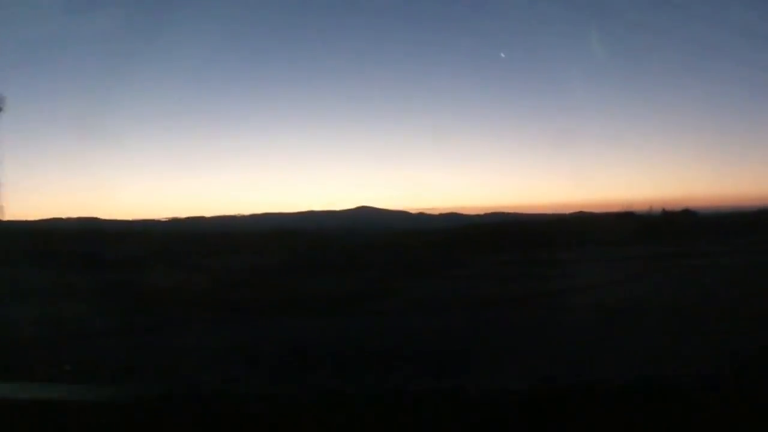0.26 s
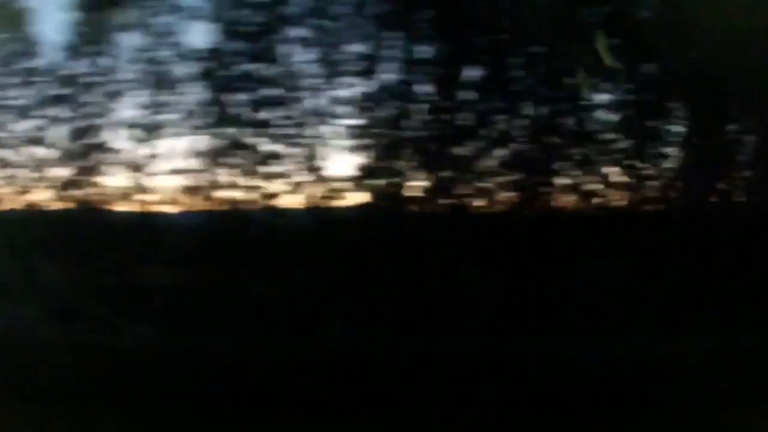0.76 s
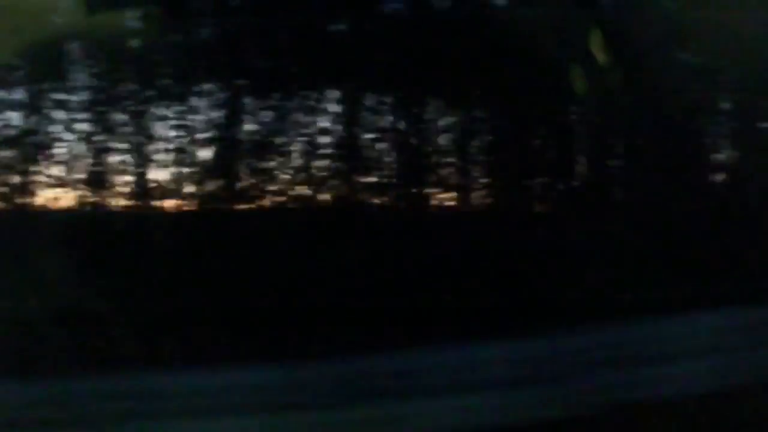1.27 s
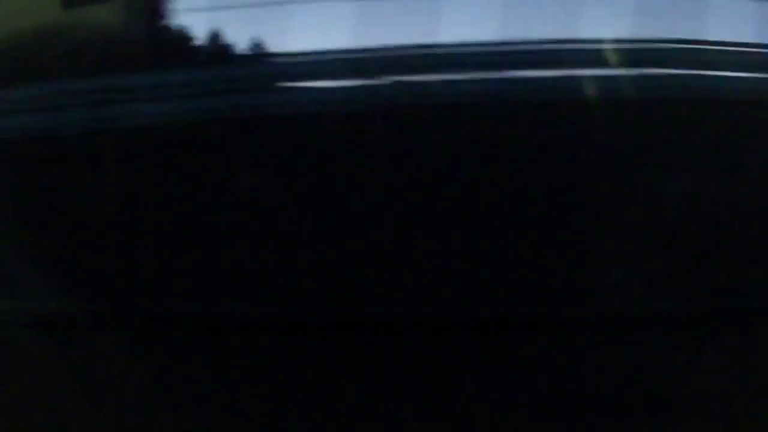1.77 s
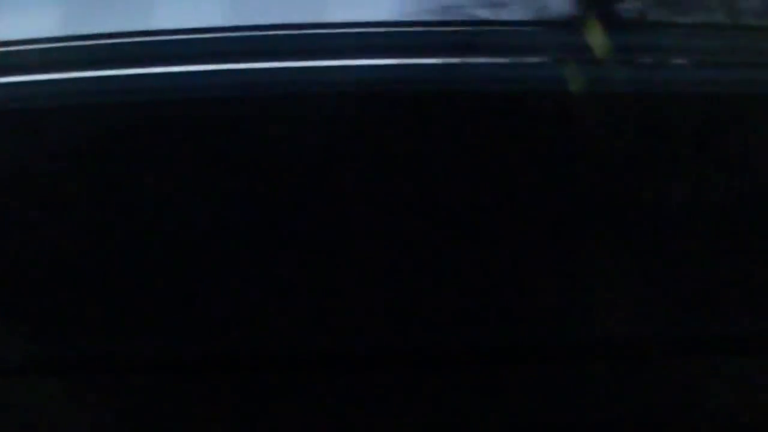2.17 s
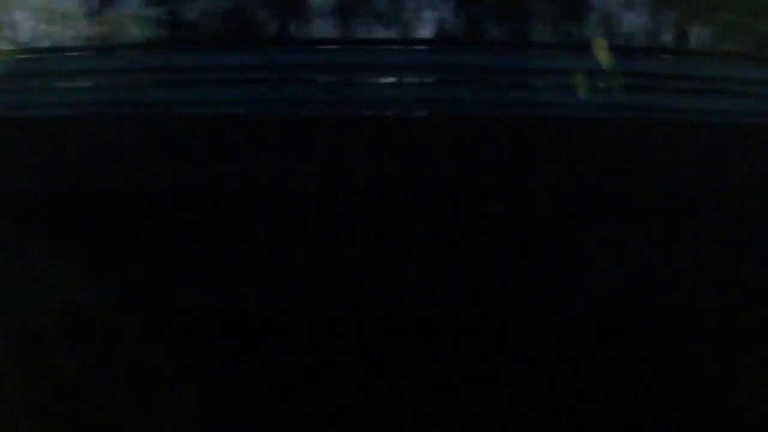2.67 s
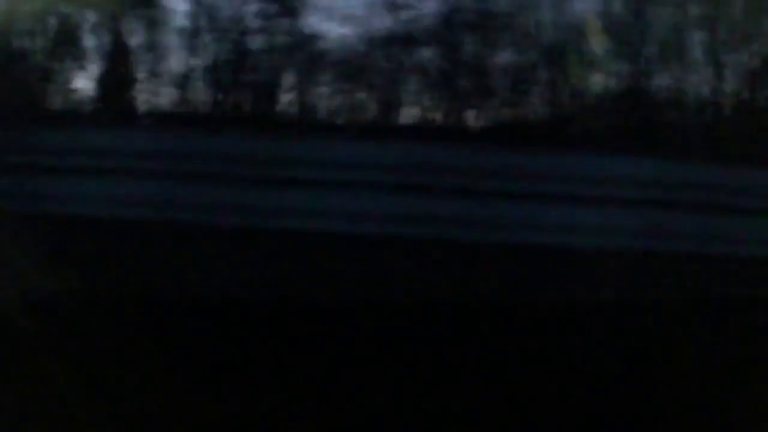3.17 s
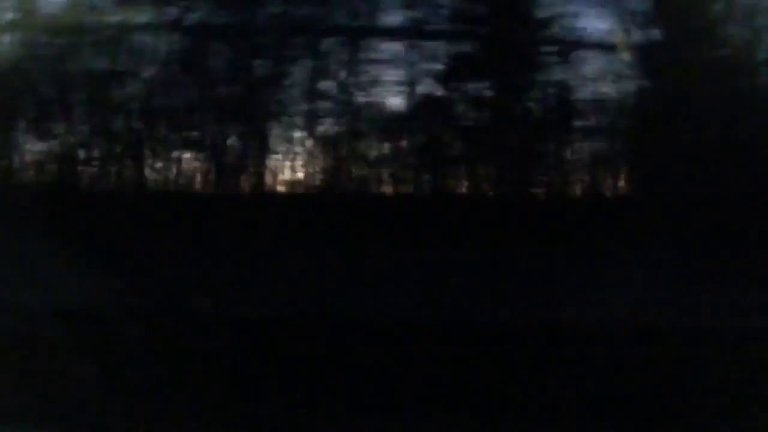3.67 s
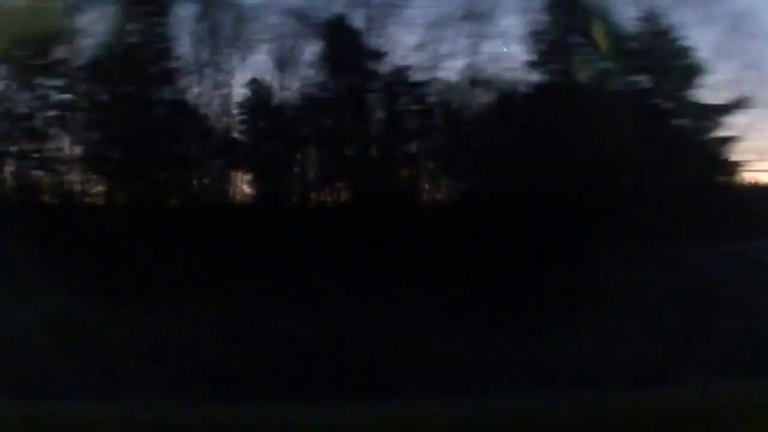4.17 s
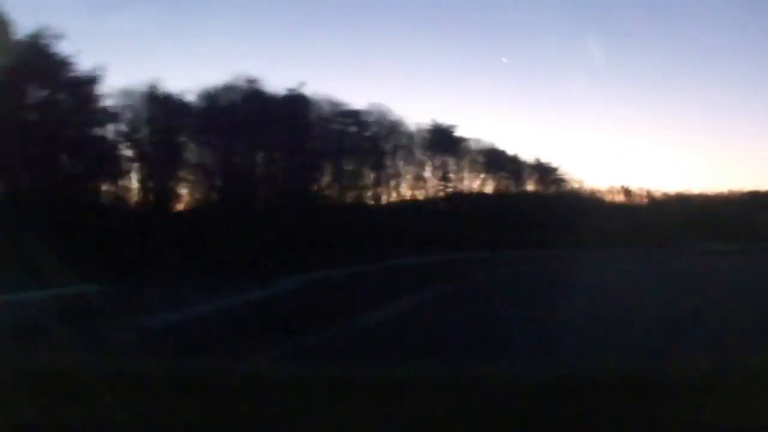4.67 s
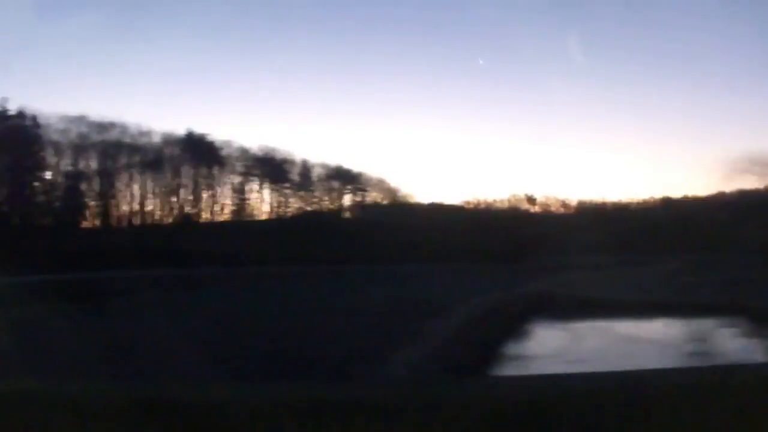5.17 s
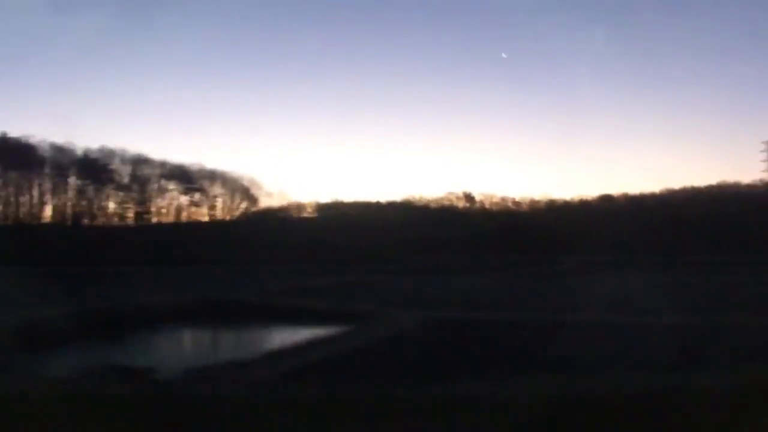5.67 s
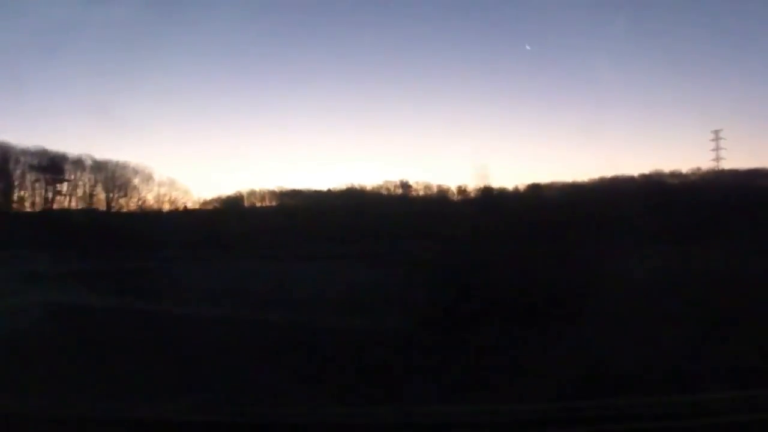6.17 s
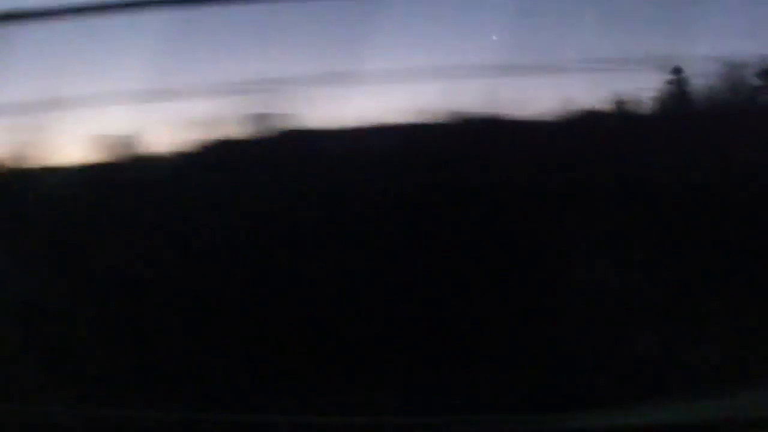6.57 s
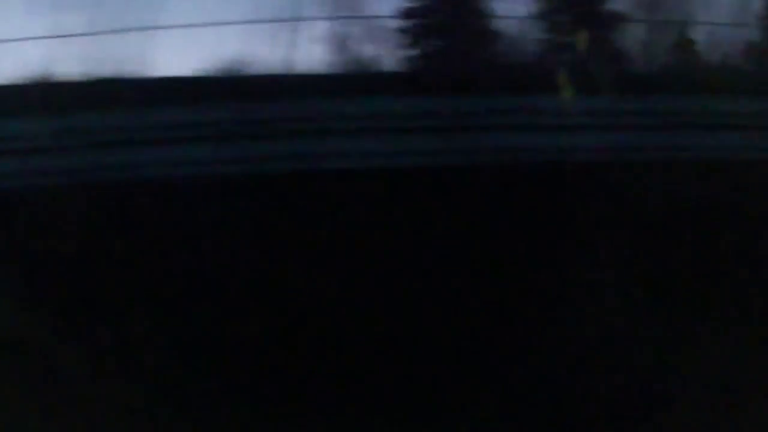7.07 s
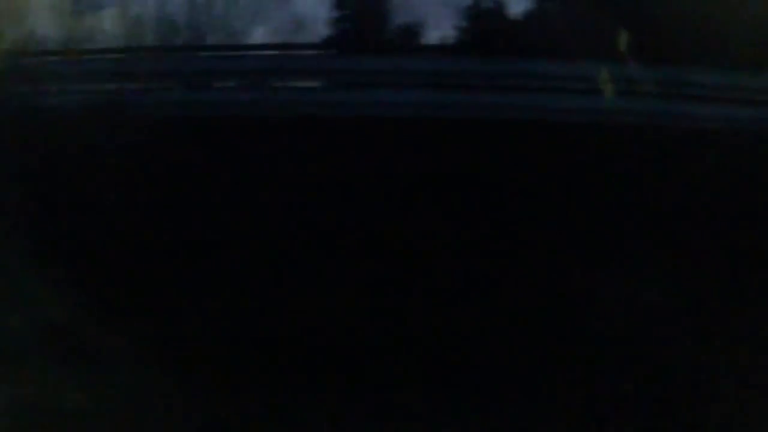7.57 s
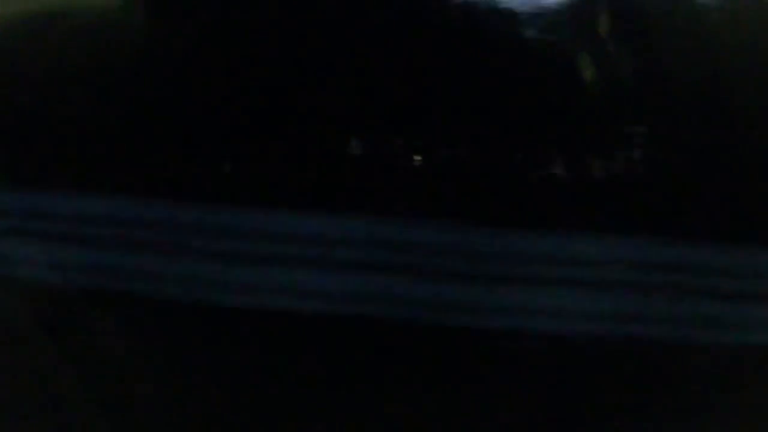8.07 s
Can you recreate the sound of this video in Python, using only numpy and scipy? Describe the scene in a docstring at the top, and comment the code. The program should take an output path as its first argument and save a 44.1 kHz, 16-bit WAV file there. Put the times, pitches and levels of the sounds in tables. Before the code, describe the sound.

A fast train runs at steady speed for about eight seconds, heard from a seat inside the passenger cabin. A low, slightly wavering drone from the floor and walls continues throughout, together with the roar of rolling wheels, a high metallic singing on the rails and a faint air hiss. Fittings tick lightly here and there. Trackside masts swish past right at the start and at 0.7 seconds. At 1.2 seconds one sharp tick rings from the trim. A faint swish follows at 3.1 seconds and a small knock at 4.3. Three more masts swish by at about 4.6, 5.1 and 5.7 seconds. The wheel noise swells most near 5.9 seconds, eases, and rises a little again around 7.1. Tiny dry snaps occur, clearest at 4.8 and 6.7 seconds. The overall sound has little deep bass and a dulled treble.

```python
"""Inside a fast train at steady speed. From the start, floor and shell drone in their cabin modes, wheels roar
and sing on the rail, air hisses and fittings tick. Two masts swish past in the first second; at 1.2 s one sharp
tick rings the trim. A faint mast follows at 3.1 s, a knock at 4.3 s, then three more masts. Near 5.9 s the
wheel noise swells most, as trackside surfaces reflect it. Throughout, the recorder cuts the bass and notches
the treble; its signal path adds two dry snaps, and faint clicks come now and then."""
import sys
import numpy as np
from scipy import signal
from scipy.fft import rfft, irfft, next_fast_len
from scipy.io import wavfile
from scipy.ndimage import map_coordinates

SR = 44100
rng = np.random.default_rng(int(sys.argv[2]) if len(sys.argv) > 2 else 0)


def log_audio(samples):
    """Write samples as a 16-bit WAV file to the path given in sys.argv[1]."""
    # one column per channel
    frames = np.atleast_2d(samples).T
    # limit to full scale, then quantise
    limited = np.clip(frames, -1, 1)
    pcm = np.round(limited * 32767).astype(np.int16)
    wavfile.write(sys.argv[1], SR, pcm)


N = 366471

# Noise spectra, as relative spectral density: frequency_hz, density_db
DRONE_SPECTRUM = [(30, -11), (60, -3.5), (100, -6.5), (140, -2.5), (220, -2.5), (350, -4), (550, -11.5),
                  (900, -22.5), (1500, -19.5)]
ROAR_SPECTRUM = [(250, -8.5), (500, 6), (800, 2.5), (1200, -2), (1700, -4.5), (2400, -13.5), (3400, -36),
                 (4500, -55.5), (6500, -46)]
SINGING_SPECTRUM = [(1200, 11), (1700, 2.5), (2300, 8), (2800, 1.5), (3500, -15.5), (4500, -38.5),
                    (6500, -39.5)]
SWISH_SPECTRUM = [(900, 12.5), (1800, 4), (2400, 11), (3400, -14), (4500, -24)]
RUSH_SPECTRUM = [(3000, -2), (4500, 1.5), (6000, 1.5), (7800, -10.5), (10000, -18)]
EDGE_SPECTRUM = [(2000, -7), (2600, -11), (3400, 3.5), (3800, -4.5), (4300, -27)]
HISS_SPECTRUM = [(2500, 7.5), (4400, -0.5), (6000, 2.5), (7800, -2), (8300, -5.5), (10000, -10),
                 (11200, -18.5), (12500, -31.5), (14500, -28), (15600, -18.5)]
# Resonances of cabin, rail and wheel: centre_hz, width_hz, lift_db
CABIN_MODES = [(114, 21.6, 7), (127.1, 12, 4.5), (168.3, 18.7, 9), (213.7, 22.4, 4), (248, 34, 4),
               (309.7, 33, 5.5), (457, 60, 4), (560, 42, 3.5)]
RAIL_MODES = [(721, 35, 4), (976, 130, 2.5)]
WHEEL_MODES = [(2190, 61, 6), (2388, 55, 4), (3640, 330, 4)]
# The drone's hum and boom waver irregularly by a few decibels: time_s, hum_db, boom_db
DRONE_WAVER = [(0, 0, -0.5), (.6, 0.5, 1), (.9, 1.5, 3), (1.15, -0.5, -1), (1.5, 0, 1), (2, 2.5, 0.5),
               (2.5, 1.5, -1.5), (3, 1.5, -0.5), (3.5, -0.5, 2), (3.72, 1, 0.5), (4, 3, -2), (4.6, -0.5, 2),
               (5.1, -2, -1.5), (5.6, 0, 1), (6.1, -3.5, 2.5), (6.6, 0.5, 0), (7.1, -3, 1), (7.6, -0.5, 2),
               (8.31, 3.5, -2)]
# Trackside reflection, given as the level of the singing: time_s, level_db
TRACKSIDE_REFLECTION = [(0, -41.5), (1.5, -42.5), (3.9, -43.5), (4.3, -41), (4.6, -40), (5.9, -35.5),
                        (6.3, -40), (6.75, -40.5), (7.1, -38), (8.31, -39)]
# Masts passing the window: peak_s, swish_db, rush_db, length_s, edge_db
MAST_PASSES = [(0.037, -27.5, -55, 0.054, -56), (0.68, -35, -56, 0.059, -51), (3.115, -43, -65, 0.071, -62),
               (4.61, -32.5, -57, 0.15, -54), (5.145, -30.5, -51.5, 0.061, -49),
               (5.72, -39, -54.5, 0.07, -48.5)]
# Contacts in the fittings: start_s, relative_level_db, contact_s, left_over_right_db
CONTACTS = [(0.153, -42, .006, -1), (0.299, -43, .006, 1), (0.810, -43, .006, 0), (0.927, -39, 0.0065, 1),
            (1.2309, -10, .00002, 4), (1.565, -32.5, 0.007, 0), (1.6, -44, .006, 2), (1.987, -42, .005, -4),
            (2.008, -44, .005, 0), (3.603, -42.5, 0.0055, 0), (4.179, -44, .006, 0), (4.254, -40, 0.011, 2),
            (4.3153, -22, 0.0074, -1), (4.668, -34.5, .007, 1), (4.867, -41, .0065, 0),
            (4.885, -42, .005, 0), (5.513, -45, .005, 0), (5.911, -43, .005, 0), (5.962, -36.5, .005, 0),
            (6.145, -44, .005, 0), (6.888, -44, .006, 0), (6.931, -42, .006, 0)]
# Modes of the struck trim: pitch_hz, relative_level_db, t60_s
TRIM_MODES = [(960, -8, 0.0076), (1490, -15, 0.014), (2100, -11, 0.003), (3370, -17.5, 0.0038),
              (4500, -15.5, 0.0018), (5640, -20.5, 0.0033), (6840, -13, 0.0041), (7250, -3.5, 0.0026),
              (8100, 1.5, 0.0016), (9040, -10.5, 0.0051), (10300, -3, 0.0033), (15500, 12.5, .002)]
# Likeness of the noise at the two capsules: frequency_hz, correlation
STEREO_CORRELATION = [(30, 0.94), (70, 0.992), (180, 0.998), (320, 0.99), (600, 0.96), (1130, 0.91),
                      (1700, 0.86), (2600, 0.66), (4000, 0.72), (8000, 0.2), (15000, 0.22)]
# Balance of the noise between the capsules: frequency_hz, left_over_right_db
STEREO_BALANCE = [(60, 0.3), (500, -0.9), (1700, 0), (2600, 0), (4500, -2), (7000, -1), (9000, -0.5),
                  (15000, -1)]
# Stop bands of the recorder: centre_hz, width_hz, depth_db
TREBLE_NOTCHES = [(3000, 800, 32), (4010, 1200, 26), (5000, 1200, 30), (11900, 2600, 40), (13600, 2500, 30)]
# Rectangular pulses: dry snaps from the signal path at 4.8 and 6.7 s, the rest faint clicks: start_s, level_db,
# length_ms
SNAPS_AND_CLICKS = [(.738, -44, .05), (1.407, -45, .12), (1.9325, -46, .06), (2.163, -46, .06),
                    (2.3275, -46, .06), (4.808, -33, .045), (6.511, -45, .06), (6.6937, -30, .15)]

TIME_S = np.arange(N) / SR
OPPOSED = np.array([[1], [-1]])   # left and right with opposite signs
OPEN_TRACK_DB = -43   # the singing with nothing beside the line


def cabin_drone(swell_db):
    """Resonance: floor and shell drone in the cabin modes; the hum and boom waver irregularly."""
    level_db = -23 + 0.18 * swell_db + 0.11 * drift(rate_hz=7.9)
    drone = from_db(level_db) * noise(DRONE_SPECTRUM, CABIN_MODES)
    hum_hz, boom_hz = (150, 190), (200, 340)
    times_s, hum_db, boom_db = np.transpose(DRONE_WAVER)
    for band_hz, waver_db in ((hum_hz, hum_db), (boom_hz, boom_db)):
        band = butterworth(drone, 1, band_hz, "band")
        drone = drone + (from_db(np.interp(TIME_S, times_s, waver_db)) - 1) * band
    return drone


def rolling_roar(swell_db):
    """Forced vibration: rolling wheels drive the rail, whose resonances colour a broad roar."""
    level_db = -30 + 0.41 * swell_db + 0.86 * drift(rate_hz=5.8)
    return from_db(level_db) * noise(ROAR_SPECTRUM, RAIL_MODES)


def wheel_singing(swell_db):
    """Resonance and reflection: wheel on rail sings in high modes, and the trackside throws it back."""
    level_db = OPEN_TRACK_DB + swell_db + 1.1 * drift(rate_hz=25)
    return from_db(level_db) * noise(SINGING_SPECTRUM, WHEEL_MODES)


def passing_masts():
    """Reflection and displacement: each mast returns the wheel noise and squeezes air along the glass."""
    envelopes = np.zeros((3, N))
    for peak_s, swish_db, rush_db, length_s, edge_db in MAST_PASSES:
        width_s = length_s * np.where(TIME_S < peak_s, 0.63, 1.18)   # comes faster than it goes
        bell = np.exp(-((TIME_S - peak_s) / width_s) ** 2)
        envelopes += from_db([[swish_db], [rush_db], [edge_db]]) * bell
    swish, air_rush, bright_edge = envelopes
    return (swish * noise(SWISH_SPECTRUM) + air_rush * noise(RUSH_SPECTRUM)
            + bright_edge * noise(EDGE_SPECTRUM))


def ticking_fittings():
    """Impact excitation: contacts ring the trim off to one side, so the right capsule hears it later."""
    out = np.zeros((2, N))
    softness_hz, right_lag_s = 10100, .000015
    for start_s, level_db, contact_s, pan_db in CONTACTS:
        drawn_out = contact_s > 1 / softness_hz
        force = contact_force(contact_s, softness_hz, drawn_out)
        tick = struck_trim(force, drawn_out) * from_db(level_db + pan_db / 2 * OPPOSED)
        if not drawn_out:
            tick += from_db(level_db + 6) * recorder_rocking(force) * OPPOSED
        start = round(start_s * SR)
        out[:, start:start + len(force)] += tick
    right = map_coordinates(out[1], [np.arange(N) - right_lag_s * SR], order=3)
    return np.array([out[0], right])


def contact_force(contact_s, softness_hz, drawn_out):
    """Compliance: a run of rough touches loses its highs; the cabin adds a faint reverberant tail."""
    t = np.arange(SR // 10) / SR
    touches, echo = rng.standard_normal((2, len(t)))
    force = np.sign(touches) * np.exp(-2 * (t / contact_s) ** 2)
    if drawn_out:
        force *= t / contact_s + 0.3   # builds before it fades
    tail_db, tail_t60_s = (-28, 0.08) if drawn_out else (-40, .026)
    tail = echo * from_db(tail_db - 60 * t / tail_t60_s)
    force = butterworth(force / np.sqrt(force @ force) + tail, 4, softness_hz)
    return butterworth(force, 2, 9000) if drawn_out else force   # a long contact is softer still


def struck_trim(force, drawn_out):
    """Modal superposition: low modes knock in alternating polarity, high modes tick in phase."""
    knock = tick = 0
    for k, (pitch_hz, level_db, t60_s) in enumerate(TRIM_MODES):
        mode = from_db(level_db) * ring(force, pitch_hz, t60_s)
        if pitch_hz < 6000:
            knock += mode * (-1) ** k
        else:
            tick += mode
    knock_db = 14.5 if drawn_out else 4.5
    return from_db(knock_db) * knock + butterworth(tick, 4, 6900, "high")


def recorder_rocking(force):
    """Sympathetic vibration: a sharp tick rocks the recorder's body, which builds up and dies away."""
    pitch_hz, t60_s, build_s, delay_s = 1950, .007, .001, .0005
    body = ring(force, pitch_hz, t60_s)
    gain = 2 * (1 - np.exp(-1 / (build_s * SR)))   # offsets the second resonator's gain
    rocking = gain * ring(body, pitch_hz, build_s * np.log(1000))
    return np.roll(rocking, round(delay_s * SR))


def air_hiss():
    """Flow noise: air makes a faint, wavering hiss."""
    return from_db(-56.5 + 0.86 * drift(rate_hz=25)) * noise(HISS_SPECTRUM)


def noise(spectrum, modes=()):
    """Partial coherence: coloured noise with resonant peaks, as two close capsules hear it; rms 1."""
    size = next_fast_len(N)
    hz = np.arange(size // 2 + 1) * SR / size
    density_db = at_hz([(spectrum[0][0] / 2, -70), *spectrum, (spectrum[-1][0] * 1.4, -70)], hz)
    for centre_hz, width_hz, lift_db in modes:
        density_db += lift_db / (1 + (2 * (hz - centre_hz) / width_hz) ** 2)
    mid, side = rfft(rng.standard_normal((2, size)))
    correlation = at_hz(STEREO_CORRELATION, hz)
    pair = np.sqrt(1 + correlation) * mid + np.sqrt(1 - correlation) * side * OPPOSED
    balance_db = at_hz(STEREO_BALANCE, hz) / 2 * OPPOSED
    return rms_one(irfft(pair * from_db(density_db + balance_db), size)[:, :N])


def drift(rate_hz):
    """Random modulation: noise smoothed above rate_hz, with rms near 1."""
    hop, settling = 40, 2000
    pole = np.exp(-2 * np.pi * rate_hz * hop / SR)
    white = rng.standard_normal(N // hop + settling + 2)
    slow = signal.lfilter([1], [1, -2 * pole, pole ** 2], white)[settling:]
    return np.interp(np.arange(N) / hop, np.arange(len(slow)), rms_one(slow))


def ring(force, pitch_hz, t60_s):
    """Damped oscillator: a unit impulse starts a decaying sine of height 1."""
    pole, angle = from_db(-60 / (t60_s * SR)), 2 * np.pi * pitch_hz / SR
    return signal.lfilter([0, np.sin(angle)], [1, -2 * pole * np.cos(angle), pole ** 2], force + 1e-18)


def notch(x, centre_hz, width_hz, depth_db):
    """Antiresonance: zeros near the unit circle over wider poles cancel one band."""
    turn = 2 * np.cos(2 * np.pi * centre_hz / SR)
    pole, zero = np.exp(-np.pi * width_hz / SR * np.array([1, from_db(-depth_db)]))
    return signal.lfilter([1, -zero * turn, zero ** 2], [1, -pole * turn, pole ** 2], x)


def butterworth(x, order, corner_hz, kind="low"):
    """Filtering with a maximally flat passband."""
    return signal.sosfilt(signal.butter(order, corner_hz, kind, fs=SR, output="sos"), x)


def at_hz(points, hz):
    """Interpolation on a logarithmic frequency axis."""
    points_hz, values = np.transpose(points)
    return np.interp(np.log(hz + 1), np.log(points_hz), values)


def from_db(db):
    """Decibels to amplitude ratio."""
    return 10 ** (np.asarray(db) / 20)


def rms_one(x):
    """Normalisation to rms 1."""
    return x / np.sqrt(np.mean(x ** 2) + 1e-20)


def scene():
    """Superposition: all sources add at the seat; trackside reflection swells drone, roar and singing."""
    swell_db = np.interp(TIME_S, *np.transpose(TRACKSIDE_REFLECTION)) - OPEN_TRACK_DB
    running = cabin_drone(swell_db) + rolling_roar(swell_db) + wheel_singing(swell_db) + air_hiss()
    return running + passing_masts() + ticking_fittings()


def record(dry):
    """Band limiting: the recorder cuts the bass, notches the treble, adds snaps and cuts the top."""
    bass_cut_hz, top_cut_hz = 147, 15850
    out = butterworth(dry, 2, bass_cut_hz, "high")
    for centre_hz, width_hz, depth_db in TREBLE_NOTCHES:
        out = notch(out, centre_hz, width_hz, depth_db)
    for start_s, level_db, length_ms in SNAPS_AND_CLICKS:
        since_s = TIME_S - start_s
        out = out + from_db(level_db) * (since_s >= 0) * (since_s < length_ms / 1000)
    return signal.sosfilt(signal.ellip(12, .5, 70, top_cut_hz, fs=SR, output="sos"), out)


dry = scene()
out = record(dry)
log_audio(out)
```